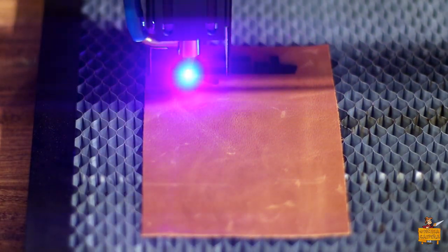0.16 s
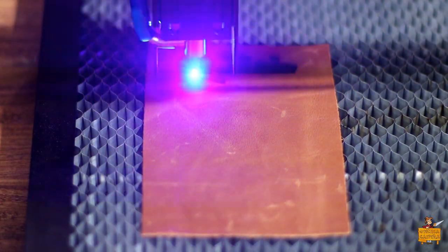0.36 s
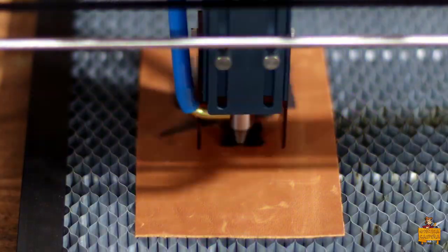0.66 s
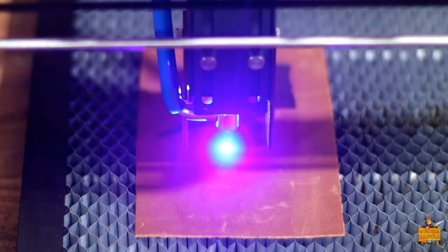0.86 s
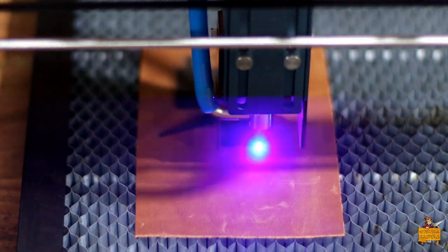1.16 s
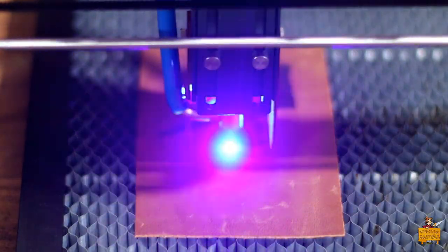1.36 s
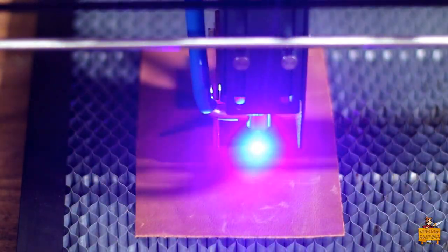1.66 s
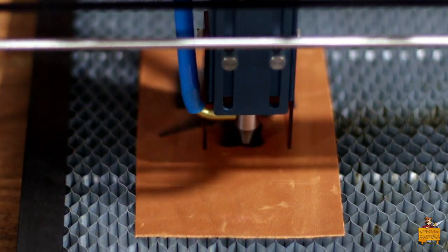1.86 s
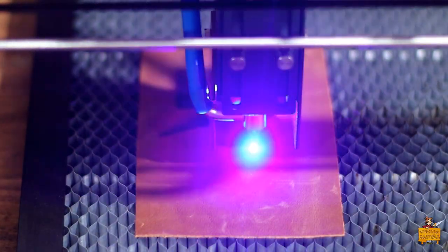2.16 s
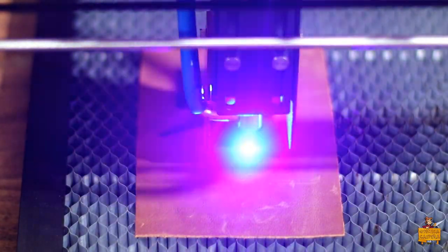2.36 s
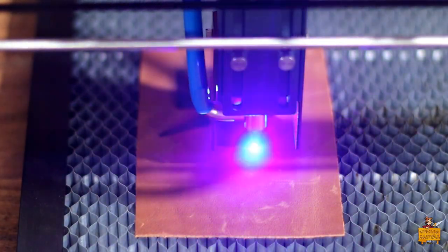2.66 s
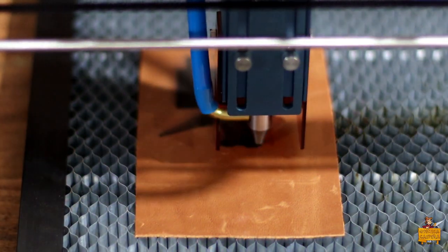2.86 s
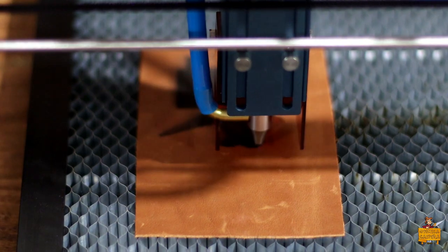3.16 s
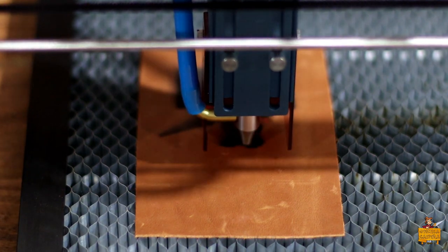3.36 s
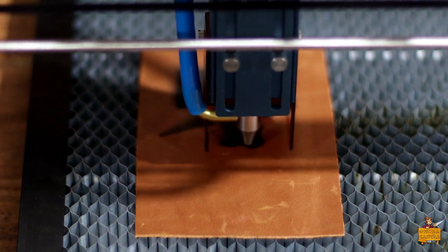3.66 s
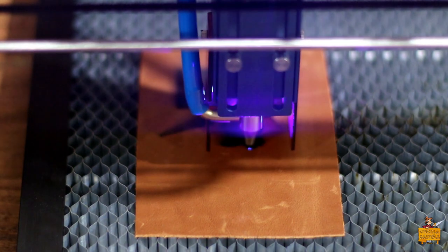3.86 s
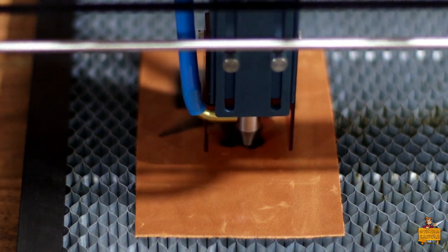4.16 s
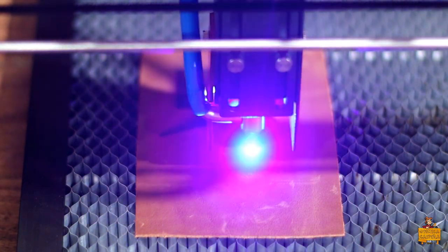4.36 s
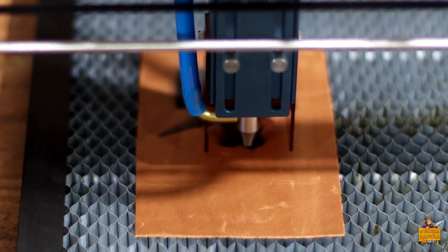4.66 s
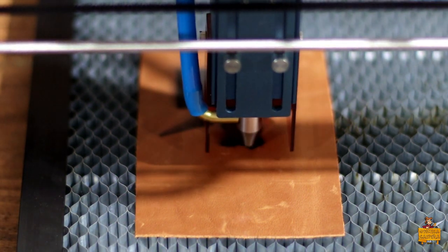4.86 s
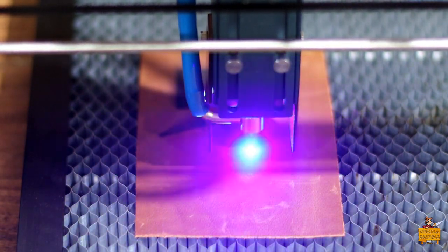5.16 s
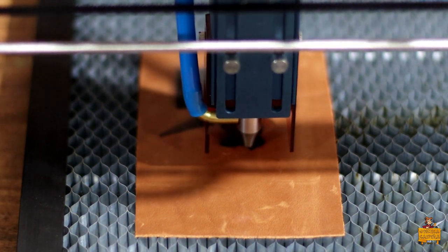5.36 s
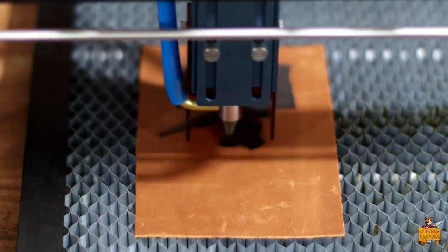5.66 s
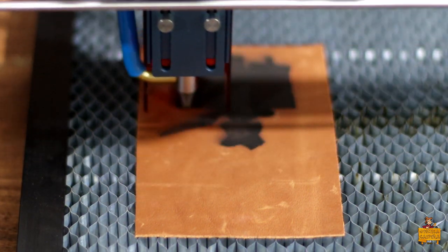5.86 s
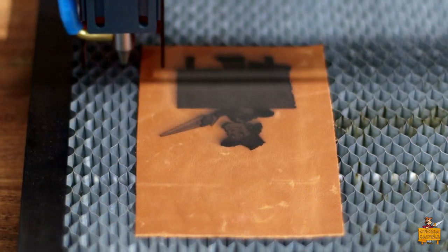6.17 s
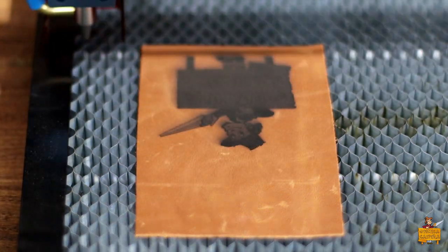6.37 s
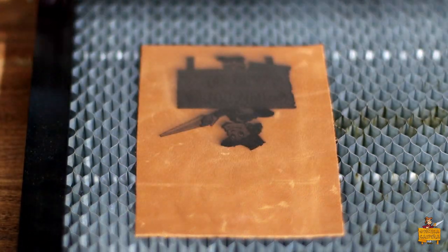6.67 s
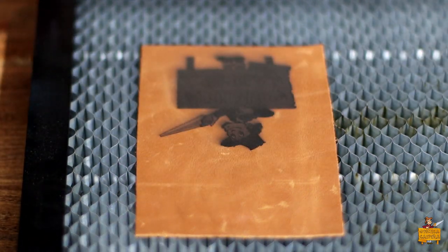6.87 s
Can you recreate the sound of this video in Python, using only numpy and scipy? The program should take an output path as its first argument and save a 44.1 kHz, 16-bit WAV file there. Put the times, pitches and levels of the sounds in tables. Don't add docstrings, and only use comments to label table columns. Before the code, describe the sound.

High electronic whines pulse on and off, ever shorter, over rushing air and a low hum, before the machine head drives away to park.

```python
import sys
import numpy as np
from scipy import signal
from scipy.fft import rfft, irfft, next_fast_len
from scipy.io import wavfile
from scipy.ndimage import uniform_filter1d

SR = 44100
rng = np.random.default_rng(int(sys.argv[2]) if len(sys.argv) > 2 else 0)


def gain_from_decibels(decibels):
    exponent = np.asarray(decibels, float) / 20
    return 10 ** exponent


def store_pcm(level_fs):
    pcm = np.round(np.clip(level_fs, -1, 1) * 32767).astype(np.int16)
    wavfile.write(sys.argv[1], SR, np.atleast_2d(pcm).T)


N = 310023
CUT_S = .586

# start_s, length_s, whine_db
TAPER = [(2.221, .08, -38.5), (2.395, .075, -38), (2.56, 0.073, -37.5), (2.723, 0.075, -40.5),
         (2.889, 0.065, -36), (3.045, 0.069, -38), (3.199, 0.061, -38), (3.355, .05, -37), (3.5, 0.05, -40),
         (3.645, 0.048, -36.5), (3.783, 0.044, -37), (3.922, 0.042, -42), (4.052, 0.046, -37),
         (4.187, 0.04, -39), (4.319, 0.037, -35.5), (4.437, 0.039, -36), (4.565, 0.035, -35.5),
         (4.682, 0.035, -38), (4.808, 0.025, -36), (4.925, 0.022, -38.5), (5.042, 0.023, -38),
         (5.158, 0.018, -39), (5.271, 0.022, -38), (5.38, 0.012, -41), (5.487, .016, -42.5),
         (5.591, 0.011, -48)]


def rms_one(x):
    return x / np.sqrt(np.mean(x ** 2) + 1e-20)


def pan(left_right_db):
    return gain_from_decibels(left_right_db / 2 * np.array([[1], [-1]]))


def level_curve(rows):
    s, db = np.transpose(rows)
    return np.interp(np.arange(N) / SR, s, db)


def at_hz(points, hz):
    point_hz, value = np.array(points).T
    return np.interp(np.log(hz + 1), np.log(point_hz), value)


def drift(rate):
    r = np.exp(-80 * np.pi * rate / SR)
    white = rng.standard_normal(N // 40 + 2002)
    slow = signal.lfilter([1], [1, -2 * r, r * r], white)[2000:]
    return np.interp(np.arange(N) / 40, np.arange(len(slow)), rms_one(slow))


def resonate(x, hz, width_hz):
    r = np.exp(-np.pi * width_hz / SR)
    poles = [1, -2 * r * np.cos(2 * np.pi * hz / SR), r * r]
    return signal.lfilter([(1 - r * r) / 2, 0, (r * r - 1) / 2], poles, x)


def stereo_noise(spectrum, lean=1):
    # pitch_hz, correlation
    likeness = [(30, .68), (70, .86), (130, .55), (300, .82), (550, .9), (1100, .72), (1700, .7),
                (2400, .38), (3100, .72), (5500, .7), (7500, .35), (9500, .62), (12700, .48), (15000, .66)]
    # pitch_hz, left_right_db
    side_lean = [(60, -.6), (300, -0.8), (1300, -0.5), (2400, -4.5), (4400, 0.5), (8000, 2), (10500, -2),
                 (12500, -0.5), (14200, -10.5), (16000, 23)]
    size = next_fast_len(N)
    hz = np.arange(size // 2 + 1) * SR / size
    mid, side = rfft(rng.standard_normal((2, size))) * gain_from_decibels(at_hz(spectrum, hz))
    alike = np.clip(at_hz(likeness, hz), 0, 1)
    shared = np.sqrt(1 + alike) * mid
    opposed = np.sqrt(1 - alike) * side * [[1], [-1]]
    both = irfft(pan(lean * at_hz(side_lean, hz)) * (shared + opposed), size)[:, :N]
    return both / np.std(both.mean(axis=0))


def sung(hz, width_hz):
    white = stereo_noise([(20, 0), (20000, 0)])
    return rms_one(resonate(resonate(white, hz, width_hz), hz, width_hz))


def air_rush(before):
    # time_s, level_db
    air = [(0, -29), (.3, -31.5), (.58, -30.5), (2, -30.5), (6, -30.5), (7.03, -30.5)]
    # pitch_hz, level_db_per_hz
    rush_low = [(15, -65), (25, -43), (90, -14), (126, -16.5), (165, -22), (206, -14.5), (271, -19),
                (332, -15), (575, -12), (876, -5), (1330, -8), (1460, 0), (2000, -3.5), (2600, -9),
                (4400, -120)]
    rush_high = [(1100, -36.5), (2000, -9.5), (3200, -2.5), (4200, -5.5), (6200, -5.5), (7000, -3),
                 (7900, 1), (8700, -10), (9600, -7.5), (10200, -16), (11300, -6), (12600, -12.5),
                 (13700, -8), (15200, -20.5)]
    first_high = [(1060, -27), (1800, -0.5), (1900, -6), (4420, -7), (5020, -7), (5960, -8), (7750, -7),
                  (11200, -11.5), (15700, -21)]
    parked_high = [(1060, -46), (1800, -1), (2010, -8), (2470, -7.5), (2990, -7.5), (3220, -11.5),
                   (4540, -5.5), (5350, -7.5), (6650, -10), (7680, -0.5), (9640, -11.5), (13100, -9.5),
                   (15700, -27)]
    high_db = level_curve(air)
    low_db = -36.5 + 0.25 * (high_db - high_db.mean())
    parked = np.interp(np.arange(N) / SR, (5.54, 6.5), [0, 1])
    after = np.sqrt(1 - parked) * stereo_noise(rush_high) + np.sqrt(parked) * stereo_noise(parked_high)
    high = before * stereo_noise(first_high) + (1 - before) * after
    return gain_from_decibels(low_db) * stereo_noise(rush_low) + gain_from_decibels(high_db + .5 * drift(7.5)) * high


def cabinet():
    # pitch_hz, width_hz, level_db
    cavities = [(1381, 14, -53), (1616, 53, -41.5), (1702, 150, -44), (2388, 26, -46), (761, 27, -53)]
    return sum(gain_from_decibels(db) * sung(hz, width_hz) for hz, width_hz, db in cavities)


def whistle():
    # time_s, level_db
    swells = [(0.0, -48), (1.72, -46), (2.02, -36.5), (2.19, -46.5), (3.5, -39.5), (3.54, -48),
              (3.7, -34.5), (3.86, -38), (4.09, -32.5), (4.21, -43.5), (5.07, -39), (6.32, -45.5),
              (6.36, -38), (6.42, -44), (6.64, -35), (6.68, -42.5), (6.99, -39), (7.03, -51)]
    db = level_curve(swells)
    turn = 2 * np.pi * np.cumsum(1478 + 2.5 * drift(10)) / SR
    return np.sqrt(2) * gain_from_decibels(db + 1.35 * drift(12)) * np.sin(turn) * pan(-2.4)


def pump(before):
    # pitch_hz, level_db, level_before_change_db
    orders = [(72, -70, -61.5), (144, -45.4, -46), (288, -51.3, -51.5), (432, -65, -62), (865, -54, -57)]
    t = np.arange(N) / SR + 0.00323 * (before > .5)
    lead_rad = 0.34 * np.array([[1], [0]])
    hum = 0
    for hz, db, first_db in orders:
        level = np.sqrt(2) * gain_from_decibels(db + (first_db - db) * before + 0.26 * drift(30))
        hum = hum + level * np.sin(2 * np.pi * hz * t + lead_rad * (hz < 200))
    return hum * pan(-.8)


def fin_echoes(t60):
    decay = gain_from_decibels(-60 * np.arange(2000) / SR / t60)
    shared, left, right = rng.standard_normal((3, 2000)) * decay
    return 1.1 * shared + left, 1.1 * shared + right


def head_fans(before):
    # blade_hz, level_db
    fans = [(152.5, -40), (159.3, -40)]
    out = 0
    for (blade_hz, db), pan_db in zip(fans, (3.5, 2.5)):
        speed_hz = blade_hz * (1 + .0025 * drift(.3) + .0006 * drift(5))
        turns = np.cumsum(speed_hz) / SR
        pulses = np.diff(np.floor(turns), prepend=0) * (1 + 0.063 * rng.standard_normal(N))
        housing = resonate(resonate(pulses, 7750, 1000), 7950, 1000)
        smeared = np.array([signal.fftconvolve(housing, fins)[:N] for fins in fin_echoes(t60=0.086)])
        out = out + gain_from_decibels(db + 4.0) * rms_one(smeared) * pan(pan_db)
    return out * (1 - before)


def travel():
    # time_s, level_db
    drive = [(6.35, -66), (6.439, -42), (6.58, -34.5), (6.69, -42), (6.745, -31), (6.79, -40),
             (6.86, -37.5), (6.95, -39), (7.03, -42)]
    # start_hz, end_hz, waver_hz, width_hz, level_db
    strands = [(4445, 4458, 6, 12, -2), (4650, 4850, 70, 40, -4)]
    out = gain_from_decibels(-5.0) * sung(4740, 400)
    for from_hz, to_hz, waver_hz, width_hz, db in strands:
        glide_hz = np.interp(np.arange(N) / SR, [drive[1][0], drive[-1][0]], [from_hz, to_hz])
        carrier = np.cos(2 * np.pi * np.cumsum(glide_hz + waver_hz * drift(8)) / SR)
        pole = np.exp(-np.pi * width_hz / SR)
        breath = .6 + rms_one(signal.lfilter([1], [1, -pole], rng.standard_normal(N)))
        out = out + gain_from_decibels(db) * breath * carrier
    return gain_from_decibels(level_curve(drive)) * out


def knocks():
    # time_s, peak_db, pitch_hz, crack_db (hardness)
    blows = [(1.266, -18, 800, -12), (1.274, -14, 800, -18), (1.282, -18, 610, 0), (1.2925, -37, 450, -12),
             (1.3103, -17, 950, -8), (1.329, -19.5, 750, -9), (1.3555, -19, 255, -17),
             (1.365, -20, 600, -11), (1.388, -17.5, 326, -12), (1.399, -27, 286, -14),
             (1.494, -25, 247, -14), (1.5147, -15, 750, -7), (1.564, -33, 352, -12), (1.568, -15, 765, -12),
             (1.5905, -19.5, 302, -1), (6.035, -16, 800, -13), (6.042, -16.5, 740, 7),
             (6.048, -27, 396, -12), (6.068, -19.5, 330, -6), (6.096, -20, 260, -14), (6.101, -27, 600, -2),
             (6.125, -16.5, 376, -3), (6.147, -26, 1600, -10), (6.21, -16.5, 307, 6), (6.217, -32, 700, 2),
             (6.222, -28, 1400, -5.5), (6.2468, -26, 1137, 10), (6.87, -35, 226, -20),
             (6.91, -36, 221, -20), (6.95, -41, 217, -20)]
    # pitch_hz, body_db
    frame_body = [(600, -4), (1000, -17)]
    # pitch_hz, left_right_db
    blow_side = [(230, 4.5), (450, -2.5)]
    out = np.zeros((2, N))
    t = np.arange(int(.06 * SR)) / SR
    for s, db, hz, crack_db in blows:
        tail = rng.standard_normal((2, len(t)))
        ring = np.sin(2 * np.pi * hz * t) * gain_from_decibels(-60 * t * hz / 5.6) * (1 - np.exp(-t / 0.00064))
        crack = np.sin(2 * np.pi * 1150 * t) * gain_from_decibels(-60 * t / 0.011) * (1 - np.exp(-t / 0.00018))
        body = gain_from_decibels(at_hz(frame_body, hz)) * np.sin(2 * np.pi * 260 * t) * gain_from_decibels(-60 * t / .015)
        after = 0.41 * rms_one(resonate(tail + 2 * tail[0], 280, 760)) * gain_from_decibels(-60 * t / 0.069)
        blow = ring + gain_from_decibels(crack_db) * crack + body + after
        at = int(s * SR)
        out[:, at:at + len(t)] += gain_from_decibels(db - 4.5) * pan(at_hz(blow_side, hz)) * blow
    return signal.sosfilt(signal.butter(4, 140, "high", fs=SR, output="sos"), out + 1e-18)


def rustle():
    # centre_s, half_length_s, level_db, fall_to_low_band_db (brightness)
    gusts = [(6.173, .014, -34.5, 3), (6.215, 0.013, -33.5, -3), (6.245, .02, -42, -9),
             (6.277, 0.0054, -27, 7), (6.33, .012, -27, 16), (6.345, .012, -27, 18),
             (6.363, .016, -24.5, 26), (6.3835, 0.009, -19, 25), (6.403, 0.013, -27.5, 5.5),
             (6.464, .012, -30, 7), (6.518, .012, -27, 15), (6.547, 0.012, -26.5, 8), (6.585, .019, -41, 3),
             (6.732, 0.0079, -27, 17), (6.748, 0.01, -32, 3.5), (6.772, 0.032, -35, 5),
             (6.379, 0.19, -32.5, 2.5)]
    # time_s, peak_db
    snaps = [(6.1688, -18), (6.315, -13), (6.3818, -9), (6.4596, -14), (6.5414, -18), (6.725, -15),
             (6.7315, -8)]
    snap_t60_s, snap_db = 0.023, -22
    gust_tail = 1.2
    t = np.arange(N) / SR
    powers = np.zeros((3, N))
    for s, half_s, db, fall_db in gusts:
        width_s = half_s * np.where(t > s, gust_tail, 1) / np.sqrt(gust_tail)
        swell = np.exp(-((t - s) / width_s) ** 2)
        for power, share in zip(powers, (0, 0.37, 1)):
            power += gain_from_decibels(2 * (db - share * fall_db)) * swell
    gains = np.sqrt(powers)
    for s, db in snaps:
        gains[0] += gain_from_decibels(db + snap_db - 60 * np.abs(t - s) / snap_t60_s) * (t > s)
    # (pitch_hz, level_db_per_hz)
    colours = ([(6000, -33), (8000, 11.5), (11000, 7.5), (13500, 9.5), (16000, -8)],
               [(3000, -27), (3900, 2), (4900, -3), (5800, 5), (6600, 2), (7600, -2), (9000, -24)],
               [(700, -32), (1100, -13.0), (2500, 3.5), (3800, 5), (5000, -30)])
    left, right = sum(gain * gain_from_decibels(1.5 * drift(150)) * stereo_noise(colour, lean=0)
                      for gain, colour in zip(gains, colours))
    return np.array([np.roll(left, -2), right])


def burning_passes():
    # start_s, length_s, whine_db, hiss_db
    outline = [(0.0, 0.15, -43.5, -36.5), (0.132, 0.027, -47, -35.5), (0.162, 0.14, -44, -37),
               (0.378, 0.11, -44.5, -36), (0.493, 0.042, -40, -35), (0.537, 0.045, -43, -35),
               (0.634, 0.098, -39, -35.5), (0.796, 0.0096, -43, -35), (0.815, .042, -34.5, -39),
               (0.957, .036, -34, -42), (1.002, 0.014, -43, -31), (1.083, 0.092, -36.5, -34),
               (1.269, 0.084, -40, -33), (1.429, 0.01, -41, -39), (1.452, 0.028, -38.5, -36),
               (1.573, 0.01, -37.5, -39), (1.606, .012, -42, -41), (1.689, 0.09, -35.5, -34.5),
               (1.872, 0.076, -39, -35), (2.029, .016, -48, -38)]
    # length_s, hiss_db
    taper_hiss = [(.013, -31), (.03, -41), (.045, -34), (.06, -34.5)]
    rim_s, smoke_builds_s, smoke_varies_db = 0.01, 0.037, 1.3
    smoky_from_s = (0.018, 0.047)
    t = np.arange(N) / SR
    whine, blur, burn, smoke = np.zeros((4, N))
    taper = [(s, length, db, np.interp(length, *np.transpose(taper_hiss))) for s, length, db in TAPER]
    for start, length, db, hiss_db in outline + taper:
        end = start + length
        on = slice(int(start * SR), int(end * SR))
        rim = min(rim_s, length / 2)
        middle_db = np.interp(length, smoky_from_s, (4.5, -4))
        exit_db = np.interp(length, smoky_from_s, (-6, 2))
        if start < CUT_S:
            middle_db, exit_db = -3.5, -7
        knots = [start, start + rim, start + 2.04 * rim, end - 1.1 * rim, end - rim, end]
        whine[on] = gain_from_decibels(db + np.interp(t[on], knots, [0, 0, middle_db, middle_db, exit_db, exit_db]))
        clouded = np.interp(t[on], knots, [0, 0, 1, 1, 0, 0])
        blur[on] = clouded * min(middle_db, 0) * (start > CUT_S)
        burn[on] = gain_from_decibels(hiss_db)
        cloud = np.interp(t[on], knots, [0.34, 0.27, 0.56, 0.38, 0.15, 0.43])
        smoke_db = hiss_db + smoke_varies_db * rng.standard_normal()
        smoke[on] = gain_from_decibels(smoke_db) * cloud * min(length / smoke_builds_s, 1)
    whine, burn, smoke = (uniform_filter1d(v, size=120) for v in (whine, burn, smoke))
    return whine, blur, burn, smoke


def beam_whine(before, blur):
    # multiple, level_db, left_right_db, left_lead_rad
    partials = [(1, -16, 0, 0), (2, -13, -2, 0), (3, -19, 0, 0), (4, -2.5, 1, 0), (5, -7, 1, 0),
                (7, -5.5, 6, 0), (8, -8.5, -2, 0), (9, -13, -3, .8), (10, -11, -6, .8), (11, -9, 1, 1.3),
                (12, -17, -12, 0), (13, -23, -4, 0)]
    # multiple, change_db
    first_whine = [(1, 13.5), (3, 13.5), (4, 3.5), (5, 8.5), (9, 13), (11, 7)]
    # multiple, after_change_db, last_pass_db
    whine_shift = [(3, 5, 0), (4, 0.4, 1.2), (5, 0.5, -.5), (9, 4, -3.5), (12, 5, 1)]
    beam_hz = 1201.8
    t = np.arange(N) / SR
    first = dict(first_whine)
    shift = {k: (1 - before) * np.interp(t, [CUT_S, TAPER[-1][0]], ends) for k, *ends in whine_shift}
    tone = 0
    for multiple, db, pan_db, lead_rad in partials:
        level_db = db + first.get(multiple, 0) * before + shift.get(multiple, 0) + 2.4 * drift(60)
        if multiple == 5:
            level_db = level_db + .9 * blur
        phase = rng.uniform(0, 2 * np.pi) + lead_rad * np.array([[1], [0]])
        tone = tone + gain_from_decibels(level_db) * np.sin(2 * np.pi * multiple * beam_hz * t + phase) * pan(pan_db)
    return tone


def laser(before):
    # pitch_hz, level_db_per_hz
    burn_colour = [(1500, -17.5), (3000, -3.5), (4000, -34), (5500, 2), (6500, -5.5), (9000, -1),
                   (10100, -32), (11500, -0.5), (12700, -21), (13400, 1), (14500, -4), (15200, -24),
                   (16000, -30)]
    first_burn = [(3500, -33), (4250, -3), (4700, 7.5), (5100, -22), (8000, -12), (8800, -3), (10200, -24),
                  (11000, 5), (12400, 3), (13000, -25)]
    # pitch_hz, width_hz, level_db
    nozzle = [(940, 1000, -6.5), (3344, 79, -3), (4436, 180, -0.5), (5785, 300, 7)]
    whine, blur, burn, smoke = burning_passes()
    hiss = gain_from_decibels(2.0) * burn * gain_from_decibels(0.72 * drift(60)) * stereo_noise(burn_colour)
    hiss = hiss + before * gain_from_decibels(1.5) * burn * stereo_noise(first_burn)
    singing = smoke * sum(gain_from_decibels(db) * sung(hz, width_hz) for hz, width_hz, db in nozzle)
    return gain_from_decibels(8.0) * whine * beam_whine(before, blur) + hiss + singing


def scene():
    t = np.arange(N) / SR
    before = np.clip((CUT_S - t) / .004 + .5, 0, 1)
    machine = air_rush(before) + cabinet() + whistle() + pump(before) + head_fans(before)
    machine = machine + travel() + laser(before)
    swing = np.interp(t, (6.2, 6.5), [0, 1])
    machine[0] += swing * (np.roll(machine[0], -1) - machine[0])
    dip = 1 - 0.45 * np.exp(-((t - CUT_S) / .004) ** 2)
    return machine * dip + knocks() + rustle()


def band_limit(x):
    return signal.sosfilt(signal.butter(12, 15880, fs=SR, output="sos"), x)


def record(dry):
    # pitch_hz, left_lead_rad
    port_phase = [(0, 0), (3400, -.2), (6000, -1.0), (8400, -1.3), (9600, -2.0), (13200, -3.8),
                  (14400, -4.6), (22050, -7)]
    size = next_fast_len(N + 512)
    hz = np.arange(size // 2 + 1) * SR / size
    lead_rad = np.interp(hz, *np.transpose(port_phase))
    left = irfft(rfft(dry[0], size) * np.exp(1j * lead_rad), size)[:N]
    return band_limit(np.array([left, dry[1]]))


dry = scene()
out = record(dry)
store_pcm(out)
```